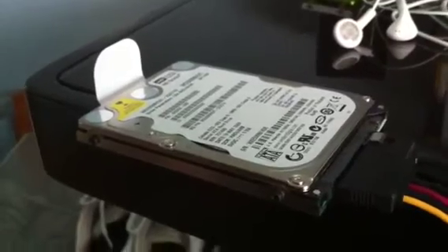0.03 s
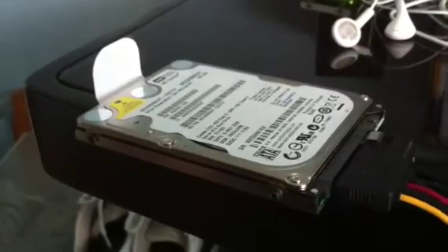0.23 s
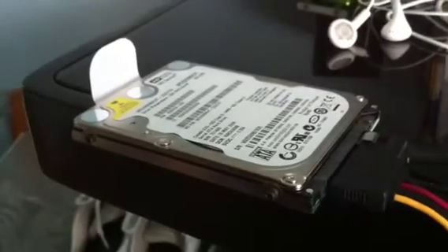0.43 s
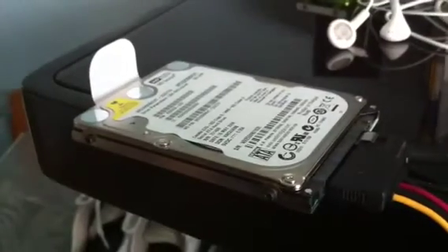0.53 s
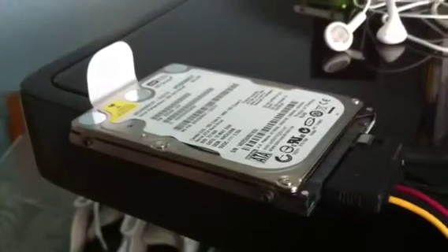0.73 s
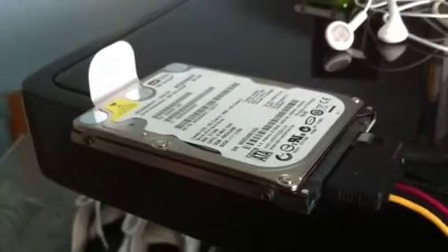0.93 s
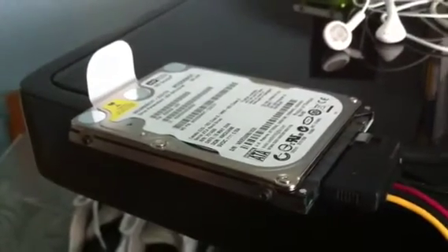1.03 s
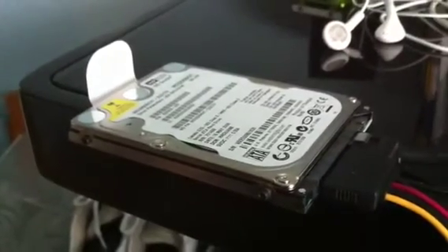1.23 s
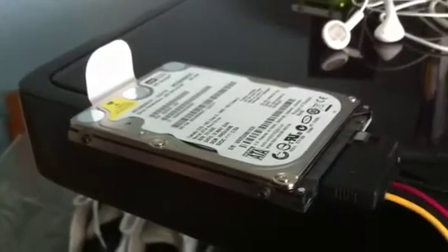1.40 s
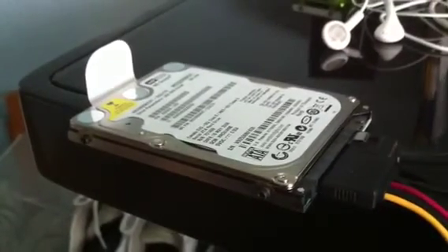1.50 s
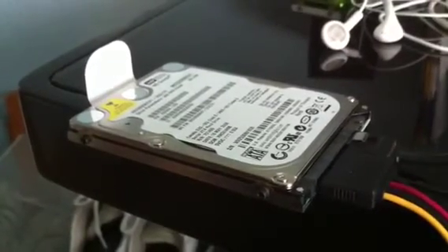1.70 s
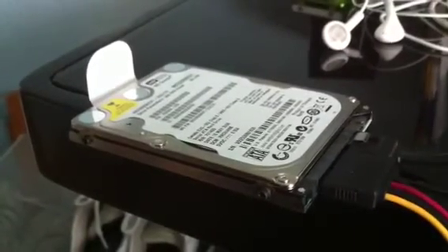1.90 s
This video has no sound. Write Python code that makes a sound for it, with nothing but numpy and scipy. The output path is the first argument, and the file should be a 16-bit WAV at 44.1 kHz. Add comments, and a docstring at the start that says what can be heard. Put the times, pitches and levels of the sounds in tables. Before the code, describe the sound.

A failing hard drive clicks twice, hard and bright, over a faint hum in a quiet room

```python
"""A quiet room, a failing hard drive on a desk: twice its arm slams against the stop with a bright, hard click.
Each blow is a sum of decaying modes plus a rattle of noise; its ring and a bare crack feed the room echo.
Around the clicks the arm ticks and whines faintly as it seeks (resonated noise), with two low knocks.
Underneath lie the hum of motor and fans (narrow-band noise) and the hiss of room air and microphone."""
import sys
import numpy as np
from scipy import signal
from scipy.fft import rfft, irfft
from scipy.io import wavfile

SR = 44100
rng = np.random.default_rng(int(sys.argv[2]) if len(sys.argv) > 2 else 0)


def log_audio(samples):
    """Write samples as a 16-bit WAV file to the path given in sys.argv[1]."""
    # one column per channel
    frames = np.atleast_2d(samples).T
    # limit to full scale, then quantise
    limited = np.clip(frames, -1, 1)
    pcm = np.round(limited * 32767).astype(np.int16)
    wavfile.write(sys.argv[1], SR, pcm)


N = 85995


def amp(db):
    """Decibels to gain."""
    return 10 ** (np.asarray(db) / 20)


def rms_one(x):
    """Scale to unit rms."""
    return x / np.sqrt(np.mean(x ** 2) + 1e-20)


def resonate(x, hz, width_hz):
    """One two-pole resonance with a gain of about 1 at its peak."""
    r = np.exp(-np.pi * width_hz / SR)
    b = np.array([1, 0, -1]) * (1 - r * r) / 2
    a = [1, -2 * r * np.cos(2 * np.pi * hz / SR), r * r]
    return signal.lfilter(b, a, x + 1e-18)


def resonate_twice(x, hz, width_hz):
    """Two equal resonances in series, for steeper skirts."""
    return resonate(resonate(x, hz, width_hz), hz, width_hz)


def steep_lowpass(x, stop_db, stop_hz):
    """Steep cut, down by stop_db from stop_hz upwards."""
    return signal.sosfilt(signal.cheby2(20, stop_db, stop_hz, fs=SR, output="sos"), x)


# Blows of the arm. Each row: start in seconds, level in dB before STRIKE_GAIN_DB, case modes in relative dB,
# top modes in relative dB, room send in dB, pitch ratio, crack peak in Hz, crack low end in relative dB.
STRIKES = [(0.2095, -15, -5, -3, 3.5, 1.007, 11600, 0), (0.618, -58, -5, -10, -8, .7, 6000, .5),
           (1.1315, -52, -8, 5, 3, 0.81, 9500, 2), (1.6633, -15.5, -10, 2, 3.5, 1.015, 13400, 3.5),
           (1.6658, -33.5, 7, -9, -6, 1.155, 9000, 2)]
# Modes of arm and case. Each row: frequency in Hz before the pitch ratio, width in Hz, level in relative dB.
MODES = [(1480, 190, -29.5), (2270, 237, -11), (2940, 280, -22.5), (4146, 210, -25), (5150, 370, -21.5),
         (6000, 350, -15.5), (6700, 230, -17.5), (7675, 680, -4.5), (9270, 420, -2), (10100, 590, -14),
         (10760, 130, -14), (11940, 690, 1), (13300, 300, -11), (14000, 480, -5), (15450, 710, -7),
         (16250, 720, -24)]
CASE_BELOW_HZ, TOP_ABOVE_HZ = 4000, 15000
SPREAD_DB, SCATTER_S = 1.5, 0.0004  # random level (plus or minus) and latest start of a mode
STRIKE_GAIN_DB, CONTACT_S = -8, 0.0016
RATTLE_DB, RATTLE_RISE_S, RATTLE_FALL_S, RATTLE_LOW_HZ = -9.5, 0.0015, 0.0013, 2260
RING_SEND_DB, CRACK_SEND_DB = -20.5, 11


def strikes():
    """Each blow builds up over the contact time and dies in every mode, over a brief rattle; also its room send."""
    out = np.zeros((2, N + SR))  # direct, sent to the room
    t = np.arange(SR // 20) / SR
    highpass = signal.butter(2, RATTLE_LOW_HZ, "high", fs=SR, output="sos")
    draws = rng.random((len(STRIKES), len(MODES), 3))
    for (start_s, db, case_db, top_db, send_db, pitch, peak_hz, low_db), draw in zip(STRIKES, draws):
        rattle_shape = (1 - np.exp(-t / RATTLE_RISE_S)) * np.exp(-t / RATTLE_FALL_S)
        rattle = rng.standard_normal(len(t)) * rattle_shape
        blow = amp(RATTLE_DB) * signal.sosfilt(highpass, rattle)
        for (hz, width_hz, mode_db), (phase, late, size) in zip(MODES, draw):
            age = np.maximum(t - SCATTER_S * late, 0)
            shape = (1 - np.exp(-age / CONTACT_S)) ** 3 * np.exp(-np.pi * width_hz * age)
            level_db = mode_db + SPREAD_DB * (2 * size - 1)
            level_db += case_db * (hz < CASE_BELOW_HZ) + top_db * (hz > TOP_ABOVE_HZ)
            tone = np.sin(2 * np.pi * (hz * pitch * t + phase))
            blow = blow + amp(level_db) * shape / shape.max() * tone
        snap = crack(len(t), peak_hz, low_db)
        send = amp(send_db) * (amp(RING_SEND_DB) * blow + amp(CRACK_SEND_DB) * snap)
        i = int(start_s * SR)
        out[:, i:i + len(t)] += amp(db + STRIKE_GAIN_DB) * np.array([blow, send])
    return out[:, :N]


CRACK_PEAK_DB, CRACK_WIDTH_HZ, DULL_BELOW_HZ = 3, 1800, 7000


def crack(length, peak_hz, low_db):
    """The bare snap of a blow: an impulse with a bright peak and more or less low end."""
    click = 1. * (np.arange(length) == 0)
    low = signal.lfilter(*signal.butter(1, DULL_BELOW_HZ, fs=SR), click)
    bright = amp(CRACK_PEAK_DB) * resonate(click, peak_hz, CRACK_WIDTH_HZ)
    return click + bright + (amp(low_db) - 1) * low


# Seeking swings of the arm. Each row: start in seconds, length in seconds, level in dB before the whine levels.
SEEKS = [(0.119, 0.01, -74), (0.131, .014, -69), (1.329, 0.019, -71), (1.564, 0.023, -67.5)]
# Whine of the arm. Each row: frequency in Hz, width per resonance in Hz, rms level in relative dB.
WHINE = [(7760, 59, -1.5), (9300, 500, -8), (10400, 310, -7.5), (11600, 1000, -10.5)]
SEEK_RISE_S, SEEK_FALL_S = 0.002, 0.006


def seeks():
    """Short puffs of friction noise, coloured by the arm's high resonances."""
    t = np.arange(N) / SR
    gate = np.zeros(N)
    for start_s, length_s, db in SEEKS:
        rise = np.clip((t - start_s) / SEEK_RISE_S, 0, 1)
        fall = np.exp(-np.maximum(t - start_s - length_s, 0) / SEEK_FALL_S)
        gate += amp(db) * rise * fall
    whine = 0
    for hz, width_hz, db in WHINE:
        whine = whine + amp(db) * rms_one(resonate_twice(rng.standard_normal(N), hz, width_hz))
    return gate * whine


# Low knocks. Each row: start in seconds, peak level in dB, frequency in Hz.
KNOCKS = [(1.644, -59, 1100), (1.792, -56.5, 1300)]
KNOCK_WIDTH_HZ, KNOCK_FALL_S = 960, 0.004


def knocks():
    """A few milliseconds of noise through one broad low resonance, applied twice."""
    out = 0
    for start_s, db, hz in KNOCKS:
        age = np.arange(N) / SR - start_s
        puff = rng.standard_normal(N) * (age > 0) * np.exp(-np.abs(age) / KNOCK_FALL_S)
        thud = resonate_twice(puff, hz, KNOCK_WIDTH_HZ)
        out = out + amp(db) * thud / np.abs(thud).max()
    return out


# Room decay. Each row: band centre in Hz, t60 in seconds, gain in dB on the band's noise.
ROOM = [(1400, 0.72, -53), (2480, 0.34, -43.5), (3500, 0.27, -45.5), (5600, 0.41, -44), (6470, .28, -41),
        (7660, 0.29, -35.5), (9340, 0.25, -31), (11100, 0.27, -34.5), (12600, 0.24, -33),
        (14200, 0.28, -36.5), (14900, .16, -37)]
# Narrow bands that linger as the case rings on. Each row: frequency in Hz, width in Hz, t60 in seconds, level in dB.
LINGER = [(1510, 100, 0.22, -61), (3770, 160, 0.21, -58), (5210, 170, 0.32, -55.5), (7600, 250, .2, -52),
          (9250, 300, 0.28, -48.5), (12200, 400, 0.24, -48.5), (13500, 300, 0.18, -48)]
EARLY_DB, EARLY_T60_S, ROOM_ONSET_S = 3.5, 0.059, 0.003
HISS_TOP_HZ = 16080  # top of room echo and hiss


def room(x):
    """Dense reflections: a quick early part and a tail that dies band by band."""
    t = np.arange(SR // 2) / SR
    centres_hz = np.array(ROOM)[:, 0]
    edges_hz = np.r_[centres_hz[0] / 1.5, np.sqrt(centres_hz[1:] * centres_hz[:-1]), 16000]
    early = amp(EARLY_DB - 60 * t / EARLY_T60_S)
    echo = 0
    for low_hz, high_hz, (_, t60_s, db) in zip(edges_hz, edges_hz[1:], ROOM):
        bandpass = signal.butter(2, [low_hz, high_hz], "band", fs=SR, output="sos")
        band = signal.sosfilt(bandpass, rng.standard_normal(len(t)))
        echo = echo + band * amp(db) * (amp(-60 * t / t60_s) + early)
    for hz, width_hz, t60_s, db in LINGER:
        ring = rms_one(resonate(rng.standard_normal(len(t)), hz, width_hz))
        echo = echo + amp(db - 60 * t / t60_s) * ring
    echo = steep_lowpass(echo, 50, HISS_TOP_HZ) * (1 - np.exp(-t / ROOM_ONSET_S))
    return signal.fftconvolve(x, echo)[:N]


# Hum of motor and fans, with faint high tones. Each row: frequency in Hz, rms level in dB, width per resonance in Hz.
HUM = [(122.6, -81, 0.67), (241.2, -79.5, 5.3), (266.4, -77, 2.84), (426.9, -82.5, 14), (546, -87.5, 6),
       (646, -86, 4.8), (770, -86.5, 5.4), (1034, -85.5, 7.5), (1446, -87.5, 5), (15000, -90, 1.5),
       (14630, -83, 290)]


def hum():
    """Wavering tones: noise twice through narrow resonances."""
    out = 0
    for hz, db, width_hz in HUM:
        tone = resonate_twice(rng.standard_normal(N + SR), hz, width_hz)[SR:]  # skip the build-up
        out = out + amp(db) * rms_one(tone)
    return out


# Colour of room air and microphone hiss. Each row: frequency in Hz, density in relative dB.
FLOOR = [(20, -10.5), (35, -28.5), (58, -26.5), (85, -13.5), (113, -9), (200, -8), (270, -3), (340, -9),
         (430, -4), (690, -12), (900, -9), (1350, -14.5), (2500, -17.5), (5000, -21), (9000, -23),
         (12500, -22.5), (15700, -22.5)]
FLOOR_RMS_DB = -67.5


def floor():
    """Smooth steady noise with the colour of the floor table."""
    table_hz, table_db = np.transpose(FLOOR)
    f_hz = np.arange(N // 2 + 1) * SR / N + 1  # +1 keeps the log finite
    colour_db = np.interp(np.log(f_hz), np.log(table_hz), table_db)
    noise = irfft(rfft(rng.standard_normal(N)) * amp(colour_db), N)
    return amp(FLOOR_RMS_DB) * rms_one(steep_lowpass(noise, 50, HISS_TOP_HZ))


def scene():
    """Drive, its room echo, hum and floor, as one channel."""
    direct, sent = strikes()
    mix = direct + room(sent) + seeks() + knocks() + hum() + floor()
    return mix[None]


CUTOFF_HZ = 17250


def record(dry):
    """Cut the top steeply."""
    return steep_lowpass(dry, 60, CUTOFF_HZ)


dry = scene()
out = record(dry)
log_audio(out)
```